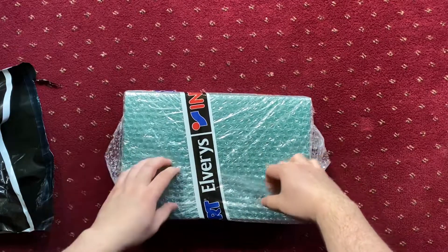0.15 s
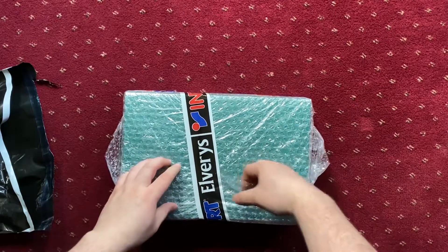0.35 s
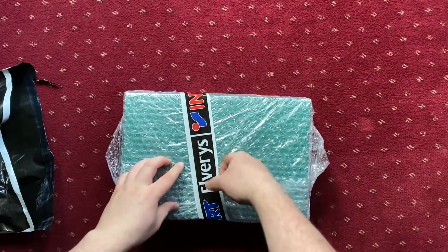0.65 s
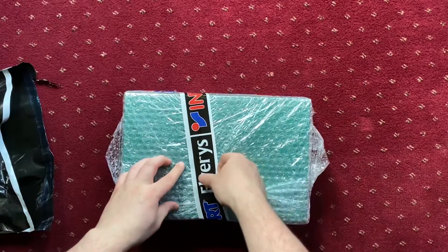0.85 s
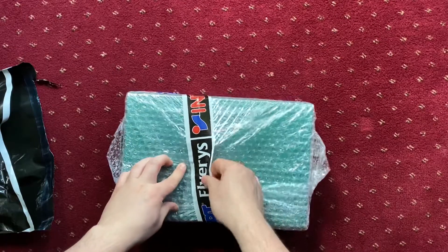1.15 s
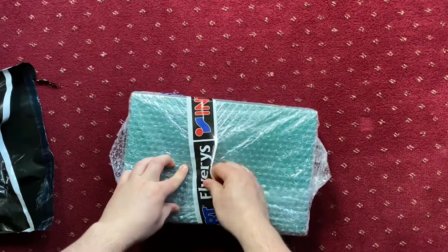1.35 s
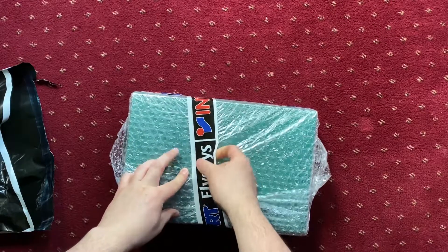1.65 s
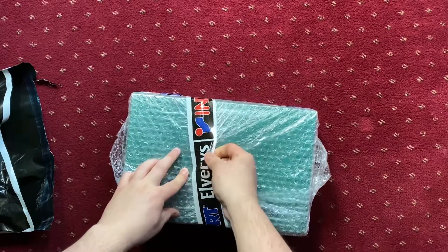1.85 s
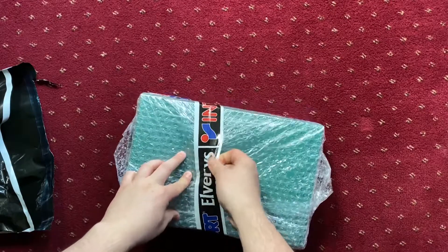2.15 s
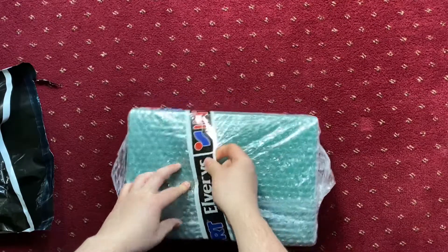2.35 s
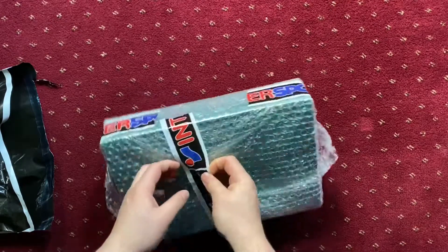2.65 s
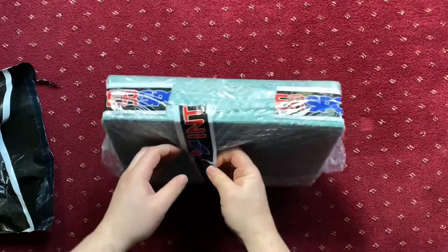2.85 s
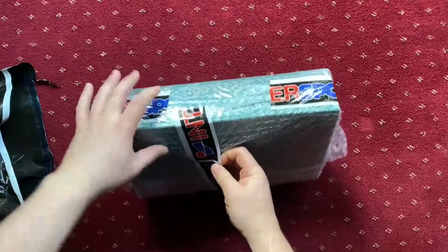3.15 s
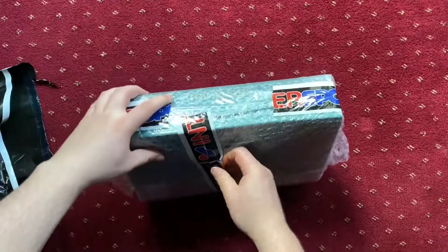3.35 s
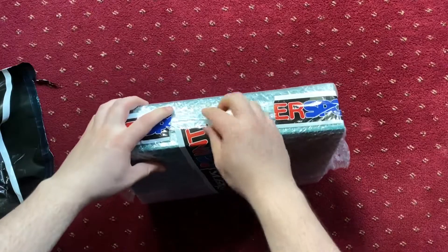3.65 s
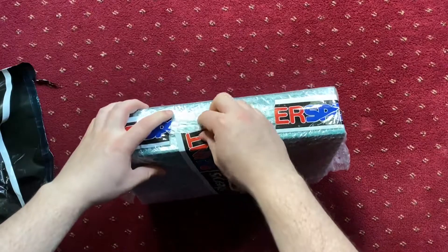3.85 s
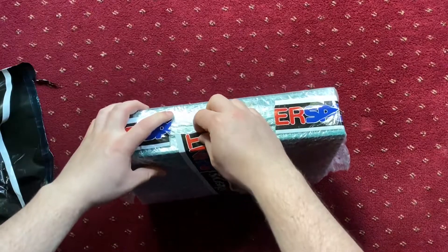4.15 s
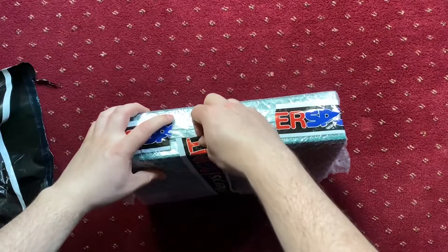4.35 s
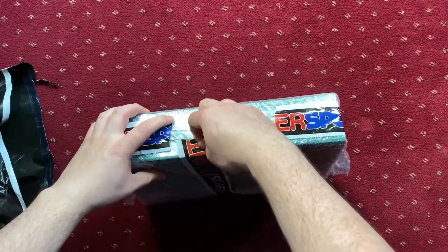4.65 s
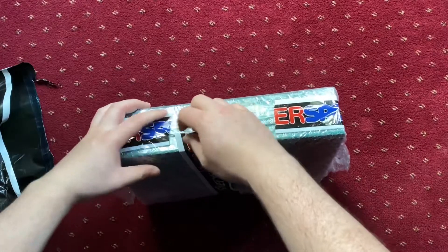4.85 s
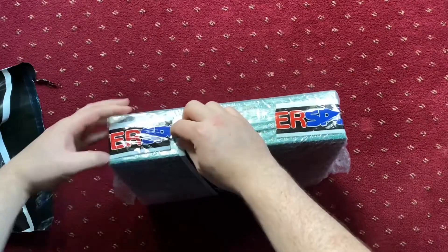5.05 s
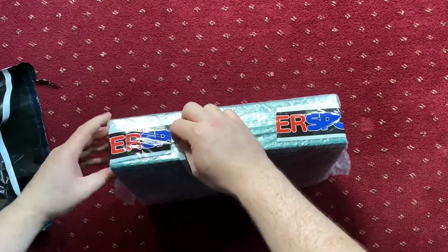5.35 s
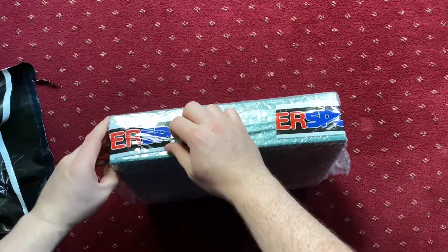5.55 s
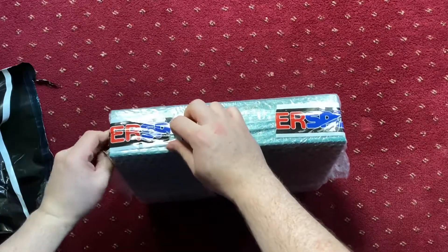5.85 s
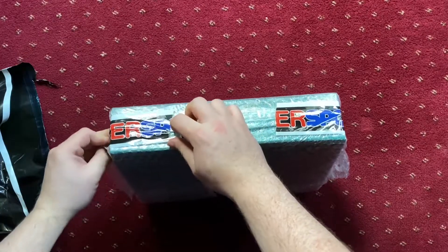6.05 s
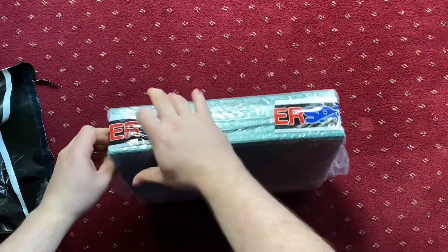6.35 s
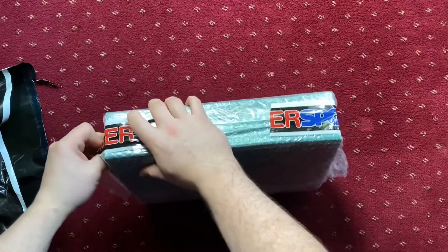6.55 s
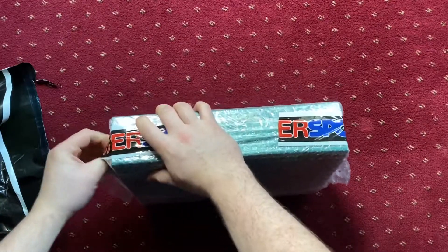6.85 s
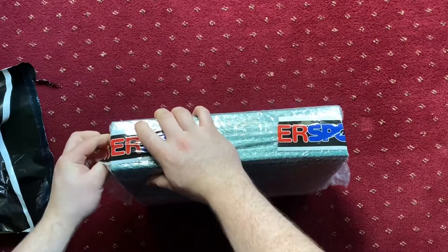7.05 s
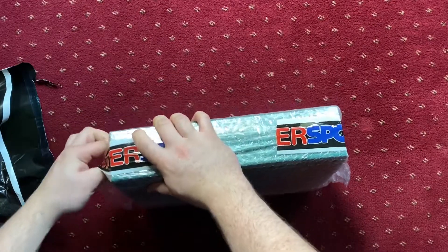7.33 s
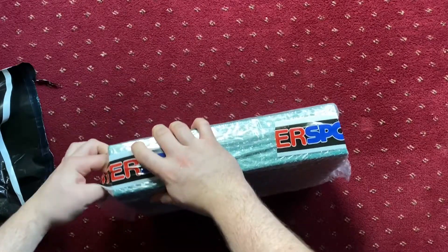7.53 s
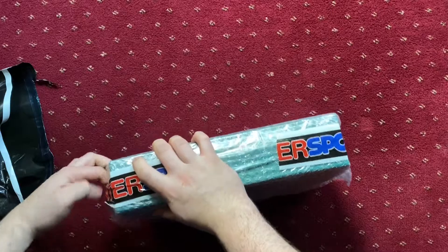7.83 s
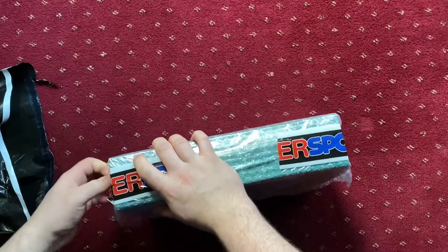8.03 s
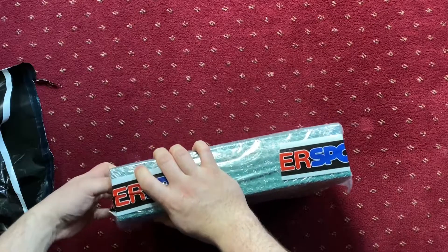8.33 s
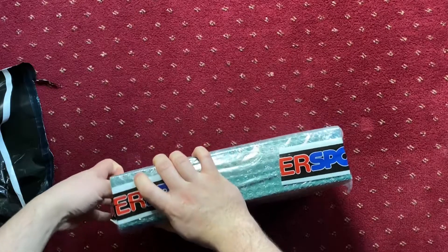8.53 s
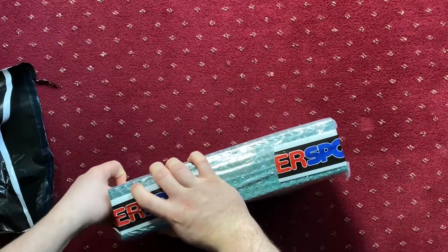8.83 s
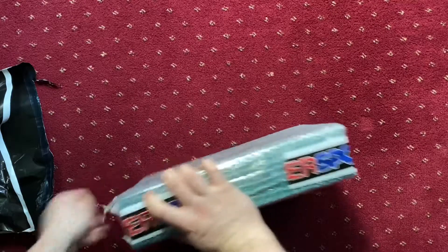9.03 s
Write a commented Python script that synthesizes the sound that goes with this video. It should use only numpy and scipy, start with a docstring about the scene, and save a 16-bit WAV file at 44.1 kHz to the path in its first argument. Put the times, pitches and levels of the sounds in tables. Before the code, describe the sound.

Crisp tape snaps and plastic crackle from a wrapped cardboard parcel, loud at first, then faint rustling and picking, ending with a sharp crack and thump.

```python
"""Picking at a wrapped cardboard box

Fingers pick at packing tape and bubble wrap on a cardboard box, on a carpet, under a phone.
Tape snaps are impulses and noise bursts exciting wrap resonances; tugs and taps ring the hollow box.
Hands add shaped-noise rustle with crackle, and a finger squeaks by stick and slip.
A small furnished room answers over a quiet room tone; the phone steers two ports into a stereo pair."""
import sys
import numpy as np
from scipy import signal
from scipy.fft import rfft, irfft, next_fast_len
from scipy.io import wavfile
from scipy.ndimage import uniform_filter1d, map_coordinates

SR = 44100
rng = np.random.default_rng(int(sys.argv[2]) if len(sys.argv) > 2 else 0)


def output_pcm(signal):
    """Save a mono or channel-first signal as 16-bit PCM at the path in sys.argv[1].

    Samples are clipped to [-1, 1] before scaling.
    """
    pcm = np.clip(np.atleast_2d(signal).T, -1, 1) * 32767
    wavfile.write(sys.argv[1], SR, np.round(pcm).astype(np.int16))


N = 405279  # length in samples

# Tape and film letting go. Each row: start in seconds, relative level of the wrap's ring in dB,
# relative level of the treble crack in dB.
SNAPS = [(0.3751, -27, -30), (0.3917, -28.5, -39), (0.5014, -33, -19), (0.709, -26.5, -19.5),
         (0.7483, -17.5, -16), (0.7601, -21, -16.5), (0.9537, -19.5, -25), (0.957, -13.5, -27.5),
         (0.9756, -9.5, -24.5), (0.979, -11, -5.5), (0.9835, -7.5, -12), (1.075, -22.5, -18.5),
         (1.109, -20.5, -14.5), (1.1424, -10.5, -8.5), (1.153, -16, -10), (1.159, -20.5, -11.5),
         (1.1644, -23, -10), (1.211, -9, -7.5), (1.2447, -12, -6.5), (1.2758, -24, -10),
         (1.2826, -8.5, -7.5), (1.2998, -13.5, -9), (1.483, -26, -35), (1.638, -22.5, -19),
         (1.7466, -25.5, -27), (1.7642, -19.5, -19), (1.7953, -21.5, -17), (1.8349, -21.5, -21.5),
         (1.897, -16, -14.5), (1.9502, -15.5, -7.5), (1.9564, -14.5, -8), (1.9847, -18, -8),
         (1.9893, -10.5, -7), (2.0846, -7.5, -11), (2.3034, -18, -35.5), (2.3228, -23.5, -19.5),
         (2.342, -18, -26.5), (2.4411, -28, -18), (2.517, -29, -13.5), (2.5931, -18, -10),
         (2.606, -19, -22.5), (2.6126, -18.5, -10), (2.6256, -8.5, -15.5), (2.6313, -16, -6.5),
         (2.6374, -14, -4.5), (2.6921, -15, -7), (2.7492, -12.5, -10), (2.7633, -14.5, -18),
         (2.7758, -8.5, -8), (3.51, -33.5, -37), (3.9529, -46, -18), (3.9562, -31, -36), (3.9665, -34, -23),
         (4.308, -57, -46), (4.3406, -56, -39), (4.44, -55, -48), (4.648, -68, -40), (4.657, -61.5, -38.5),
         (4.7096, -48, -37), (4.733, -56, -43.5), (4.822, -63, -43), (4.8795, -40.5, -38.5),
         (4.929, -53, -37), (5.398, -60, -37.5), (5.6953, -40, -28.5), (5.7246, -36, -26.5),
         (5.8206, -15, -9.5), (5.9282, -25.5, -17), (6.019, -35.5, -24), (6.235, -34, -34),
         (6.558, -44, -29), (6.6253, -28, -10), (6.6976, -26.5, -18.5), (6.7373, -39.5, -22.5),
         (6.8158, -34, -26.5), (7.2029, -27, -29.5), (7.369, -45.5, -26.5), (7.392, -30.5, -34),
         (7.514, -38.5, -57), (7.8966, -27.5, -30.5), (7.994, -30, -41.5), (8.419, -35.5, -31),
         (8.4752, -32, -32), (8.537, -30.5, -33), (8.7257, -22, -19), (8.768, -39, -18.5),
         (8.923, -22.5, -24.5), (8.9929, -20, -26), (9.0565, -13.5, -24.5), (9.0911, -17.5, -29),
         (9.109, -26, -26), (9.116, -6, -17)]
# Resonances of the taut wrap. Each row: centre in Hz, width in Hz, gain in dB.
WRAP_MODES = [(1734, 1125, 6.5), (2400, 4020, -3), (4230, 1200, 3)]
# Spectrum of the crack. Each row: frequency in Hz, relative density in dB per Hz.
CRACK_SPECTRUM = [(3000, -20.5), (5500, -7), (9500, -0.5), (13000, -1.5), (15700, -10.5), (16200, -29.5)]


def snaps():
    """Impulsive release: a dry treble crack and a short ring of the taut wrap, high if crisp, low if dull."""
    start, ring_db, crack_db = np.transpose(SNAPS)
    crisp_db = 0.47 * (crack_db - ring_db)

    crack = jolts(start + 0.001, crack_db + 11.5)
    crack += bursts(start, crack_db + 17.5, rise=0.0013, t60=0.011)

    low = jolts(start, ring_db + 12.5)
    low += bursts(start, ring_db - crisp_db + 10, rise=0.00031, t60=0.01)
    low += bursts(start, ring_db + 11.0, rise=0.0046, t60=0.054)
    high = bursts(start, ring_db + crisp_db + 20, rise=0.00034, t60=0.016)

    # the pull reaches the cardboard a moment later
    thud = bursts(start + 0.003, ring_db + 22, rise=0.0012, t60=0.018)

    wrap = filtered(low, modes(WRAP_MODES[:1])) + filtered(high, modes(WRAP_MODES[1:]))
    return filtered(crack, colour(CRACK_SPECTRUM)) + wrap + filtered(thud, modes(BOX_MODES))


# Tugs and taps on the box. Each row: time in seconds, relative level of the boom in dB,
# relative level of the tap in dB.
KNOCKS = [(0.981, -33.5, -45), (1.159, -30, -47), (1.214, -29, -38), (1.242, -25, -40), (1.283, -29.5, -36),
          (1.634, -37.5, -24), (2.304, -31, -38), (2.531, -34.5, -61), (2.639, -30, -56), (2.777, -18, -31),
          (3.072, -34.5, -37.5), (3.507, -42.5, -36), (3.955, -42.5, -39), (4.389, -39.5, -48),
          (4.678, -52, -70), (4.705, -50.5, -70), (4.881, -51.5, -51), (5.822, -31, -36),
          (6.118, -47, -42.5), (6.238, -37, -52), (6.397, -40, -53), (6.432, -41, -58), (6.527, -38, -44),
          (6.984, -26.5, -46), (8.287, -40.5, -70), (8.347, -41, -49), (8.36, -39.5, -42.5),
          (8.46, -35.5, -68), (9.119, -15, -13)]
# Resonances of the cardboard box. Each row: centre in Hz, width in Hz, gain in dB.
BOX_MODES = [(152.3, 86, -3.5), (218.7, 73.4, 2.5), (278, 78.6, 0), (414, 89, -5), (675, 620, -6.5)]


def knocks():
    """Modal excitation: a soft push rings the air in the box; a tap just before wakes the stiffer panels."""
    time, boom_db, tap_db = np.transpose(KNOCKS)

    def soft_push(hz):
        return modes(BOX_MODES)(hz) / (1 + 1j * hz / 350) ** 2

    def panel_tap(hz):
        return modes(BOX_MODES[3:])(hz) / (1 + 1j * hz / 1200)

    boom = filtered(jolts(time, boom_db + 47.0), soft_push)
    tap = filtered(jolts(time - 0.002, tap_db + 43.5), panel_tap)
    return boom + tap


# Spectrum of the sliding film. Each row: frequency in Hz, relative density in dB per Hz.
FILM_SPECTRUM = [(1200, -42), (2800, -2), (6000, -7), (9500, -0.5), (15700, -7.5), (16200, -26)]


def rustle():
    """Friction noise: skin on plastic hisses and crackles, scuffs the wrap and rumbles in the box."""
    film_db, wrap_db, box_db = hands()
    flutter = wobble(22)
    film, wrap = colour(FILM_SPECTRUM), modes(WRAP_MODES[:2])

    hiss = amp(film_db - 5.0 + 2.8 * flutter) * unit(filtered(patchy(depth_db=3.5), film))
    scuff = amp(wrap_db - 4 + 0.95 * flutter) * unit(filtered(patchy(depth_db=2), wrap))
    grains = crackle(wrap_db + 23, count=2500, spread_db=3.5)
    scuff += filtered(bursts(*grains, rise=0.00026, t60=0.013), wrap)

    def box_above_bass(hz):
        return modes(BOX_MODES[:4])(hz) / (1 + (110 / (hz + 1)) ** 4)

    rumble = amp(box_db + 4 * wobble(25)) * unit(filtered(patchy(depth_db=4.0), box_above_bass))

    creases = crackle(film_db + 21.5, count=1300, spread_db=4.0)
    ticks = filtered(bursts(*creases, rise=0.00026, t60=0.032), film)

    # every crease has its own size and pitch
    crease_hz = 2900 * np.exp(0.52 * rng.standard_normal(500))
    creases = crackle((film_db + wrap_db) / 2 + 13.5, count=500, spread_db=4.5)
    pops = bursts(*creases, rise=0.0002, t60=0.004, hz=crease_hz)
    return hiss + scuff + rumble + ticks + pops


# Steady contact of the hands. Each row: time in seconds, relative film level in dB,
# relative wrap level in dB.
CONTACT = [(0.01, -55, -59), (0.08, -57, -69.5), (0.11, -47.5, -61), (0.58, -49.5, -54.5),
           (0.9, -52.5, -71.5), (1.42, -48.5, -55), (2.55, -52, -55.5), (2.95, -52.5, -55.5),
           (3.2, -62, -69), (3.62, -65.5, -79), (4.25, -64.5, -105), (5.32, -66, -72.5), (5.36, -53.5, -62),
           (5.95, -51, -61), (6.9, -48, -52), (7.1, -51.5, -57), (8.1, -51, -57.5), (8.22, -60, -65),
           (8.6, -51.5, -54.5), (9.1, -46.5, -59)]
# A finger or palm sweeps over the parcel. Each row: time of the peak in seconds, swell in seconds,
# fade in seconds, relative film level in dB, relative box rumble level in dB.
SWEEPS = [(0.259, 0.0059, 0.023, -30, -49), (0.505, 0.0047, 0.033, -32.5, -65),
          (3.479, 0.16, .05, -43.5, -57), (4.87, 0.02, 0.053, -50.5, -68.5),
          (6.25, 0.12, 0.022, -61.5, -52), (7.282, 0.027, 0.06, -40, -69.5),
          (8.672, 0.033, 0.078, -94.5, -45.5)]
RUMBLE_GROWS, RUMBLE_DB = 0.62, -23  # box rumble: dB per dB of wrap level, and offset in dB
SWEEP_SLOPE_DB = 12  # loss one swell or fade time from the peak


def hands():
    """Contact pressure as levels in dB: box rumble follows the wrap; sweeps add to film and box."""
    t = np.arange(N) / SR
    film_db, wrap_db = curves(CONTACT)
    gains = amp([film_db, RUMBLE_GROWS * wrap_db + RUMBLE_DB])
    for peak, swell, fade, *peak_db in SWEEPS:
        distance = np.maximum((peak - t) / swell, (t - peak) / fade)
        gains = gains + amp(peak_db)[:, None] * amp(-SWEEP_SLOPE_DB * distance)
    film_db, box_db = 20 * np.log10(gains)
    return film_db, wrap_db, box_db


def crackle(level_db, count, spread_db):
    """Clustered random events: tiny creases pop in clumps, a few far louder; gives times and levels."""
    draw = rng.random((count, 2))
    clumps = np.cumsum(amp(7 * wobble(9.4)))
    at = np.searchsorted(clumps, draw[:, 0] * clumps[-1]).clip(0, N - 1)
    return at / SR, level_db[at] - spread_db * np.log(1.015 - draw[:, 1])


def patchy(depth_db):
    """Modulated noise: two rows whose loudness drifts in small patches of pitch and time."""
    spectrum = signal.stft(rng.standard_normal((2, N)), nperseg=256)[2]
    field = rng.standard_normal(spectrum.shape[1:])
    field = uniform_filter1d(field, size=4, axis=0)  # across pitch
    field = uniform_filter1d(field, size=8, axis=1)  # across time
    return signal.istft(spectrum * amp(depth_db * unit(field)), nperseg=256)[1][:, :N]


# A finger drags on the tape. Each row: time in seconds, pitch in Hz, relative level in dB.
SQUEAK = [(5.96, 2586, -45), (6.045, 2057, -43), (6.068, 1797, -42.5), (6.095, 2216, -42),
          (6.13, 1417, -49)]


def squeak():
    """Stick-slip friction: skin on tape gives a rough gliding tone with a weaker strand below it."""
    hz, db = curves(SQUEAK)
    t = np.arange(N) / SR
    on = (t > SQUEAK[0][0]) & (t < SQUEAK[-1][0])

    def strand(ratio):
        unsteady_hz = ratio * hz * (1 + 0.07 * wobble(120))
        return wobble(500) * np.sin(2 * np.pi * np.cumsum(unsteady_hz) / SR)

    tone = on * amp(db) * (strand(1) + amp(-9) * strand(0.4))
    return tone * np.array([[1], [0]])  # alike at both ports


# Reverberation of the room. Each row: frequency in Hz, time to fall by 60 dB in seconds.
ROOM_T60 = [(150, 0.44), (2000, 0.35), (12000, 0.12)]


def room(x):
    """Reverberant decay by frequency: a fresh random noise tail answers each quarter second of sound."""
    out, hop = np.zeros((2, N + 2 * SR)), SR // 4
    delay = 300  # samples before the answer begins
    for start in range(0, N, hop):
        hz, t, spectrum = signal.stft(rng.standard_normal((2, SR // 2)), SR, nperseg=256)
        decay = amp(-60 * t / along(ROOM_T60, hz)[:, None])
        tail = signal.istft(spectrum * decay, SR, nperseg=256)[1]
        wet = signal.fftconvolve(x[:, start:start + hop], tail / np.linalg.norm(tail[0]), axes=1)
        out[:, start + delay:start + delay + wet.shape[1]] += wet
    return out[:, :N]


# Spectrum of the room tone. Each row: frequency in Hz, density in dB per Hz.
AIR_SPECTRUM = [(20, -125), (55, -89), (220, -96.5), (1300, -118), (4000, -110), (15700, -120),
                (16200, -135)]


def room_tone():
    """Stationary background noise: white noise of unit density per Hz, coloured by its spectrum."""
    return filtered(rng.standard_normal((2, N)), colour(AIR_SPECTRUM)) * np.sqrt(SR / 2)


def amp(db):
    """Level law: decibels to an amplitude ratio."""
    return 10 ** (np.asarray(db) / 20)


def unit(x):
    """Normalisation to an effective (RMS) value of one."""
    return x / np.sqrt(np.mean(x ** 2) + 1e-20)


def along(points, hz):
    """Logarithmic frequency scale: interpolate (Hz, value) points on it."""
    f, v = np.transpose(points)
    return np.interp(np.log(hz + 1), np.log(f + 1), v)


def curves(rows):
    """Linear interpolation: one value per sample for each column after the time."""
    s, *cols = np.transpose(rows)
    return [np.interp(np.arange(N) / SR, s, c) for c in cols]


def wobble(rate):
    """Slow random modulation: a smooth random curve, rate knots a second."""
    knots = rng.standard_normal(int(N * rate / SR) + 4)
    return map_coordinates(knots, [np.arange(N) * rate / SR])


def filtered(x, response):
    """Linear filtering: the spectrum of x times a complex response of frequency."""
    m = next_fast_len(N + SR // 2)
    return irfft(rfft(x, m) * response(np.fft.rfftfreq(m, 1 / SR)), m)[..., :N]


def modes(table):
    """Modal superposition: the causal response of resonances of alternating sign."""
    def response(f):
        return sum((-1) ** k * amp(db) * 1j * f * width / (centre * centre - f * f + 1j * f * width)
                   for k, (centre, width, db) in enumerate(table))
    return response


def colour(points):
    """Spectral shaping: a gain over frequency without phase shift."""
    return lambda hz: amp(along(points, hz))


def jolts(times, db):
    """Ideal impulses: single pushes, alike at both ports."""
    push = np.zeros((2, N))
    push[0, np.round(times * SR).astype(int)] = amp(db)
    return push


def bursts(times, db, rise, t60, hz=None):
    """Exponential decay: noise bursts of set energy, or damped tones if given a pitch each."""
    t = np.arange(SR // 25) / SR
    shape = (1 - np.exp(-t / rise)) * amp(-60 * t / t60)
    grain = rng.standard_normal((len(times), 2, len(t)))  # other fine detail in each row
    if hz is not None:
        phase = np.pi * grain[..., :1]
        grain = np.sin(2 * np.pi * hz[:, None, None] * t + phase)
    grain = grain * shape
    grain *= amp(db)[:, None, None] / np.linalg.norm(grain, axis=2, keepdims=True)
    first = np.round(np.asarray(times) * SR).astype(int)
    at = (first[:, None] + np.arange(len(t))).ravel()
    return np.array([np.bincount(at, grain[:, c].ravel(), N + SR)[:N] for c in range(2)])


def scene():
    """Superposition: the two rows are what both ports share and what differs between them."""
    near = snaps() + knocks() + squeak()
    return near + amp(-9.5) * room(near) + rustle() + room_tone()


# Unlike part of the ports. Each row: frequency in Hz, gain in dB.
WIDTH = [(100, -13), (700, -7), (5500, -2.5), (8500, -10)]
# Left level over right. Each row: frequency in Hz, difference in dB.
LEFT_TILT = [(60, 1.5), (1200, 3.5), (2300, 1), (3700, 7), (6000, 2), (7500, 5), (8300, 0)]
# Left phase ahead of right. Each row: frequency in Hz, lead in radians.
LEFT_LEAD = [(0, 0), (430, 1.1), (1640, 5.2), (2240, 6.6), (3200, 7.8), (5080, 7), (7300, 5.1), (8000, 3.2),
             (11500, -.6), (15400, -6.1)]
TOP_HZ = 16900  # upper band limit


def record(dry):
    """Interchannel differences: level tilt and phase lead steer the ports; peaks round off, band ends."""
    shared, unlike = dry[0], filtered(dry[1], colour(WIDTH))
    side = np.array([[0.5], [-0.5]])  # half of each difference to either side

    def steer(hz):
        lead = np.interp(hz, *np.transpose(LEFT_LEAD))
        return amp(side * along(LEFT_TILT, hz)) * np.exp(1j * side * lead)

    pair = filtered(np.array([shared + unlike, shared - unlike]), steer)
    pair = pair / (1 + np.abs(pair / 0.9) ** 4) ** (1 / 4)  # soft ceiling at 0.9
    return filtered(pair, lambda hz: hz < TOP_HZ)


dry = scene()
out = record(dry)
output_pcm(out)
```